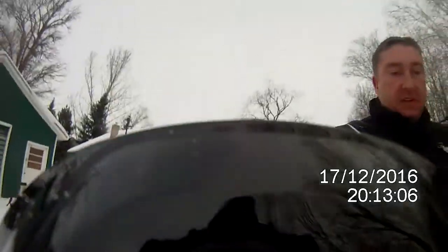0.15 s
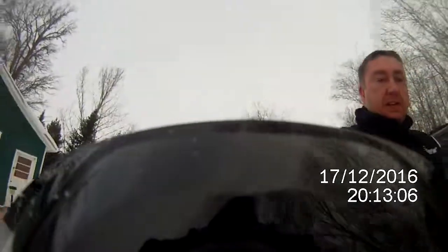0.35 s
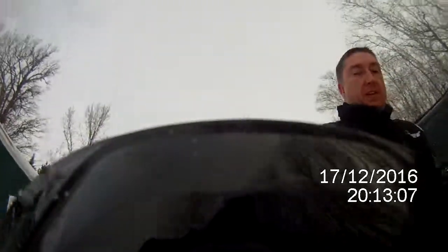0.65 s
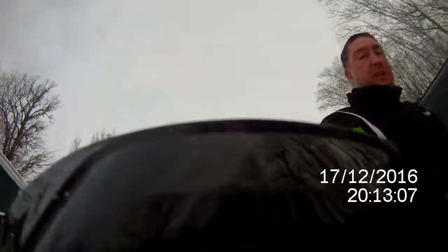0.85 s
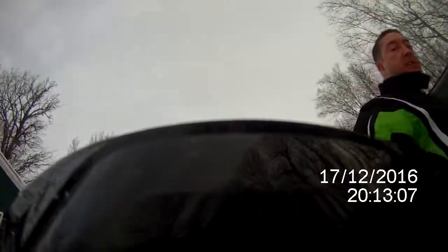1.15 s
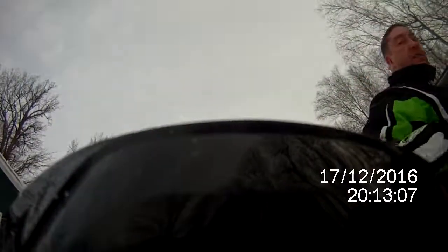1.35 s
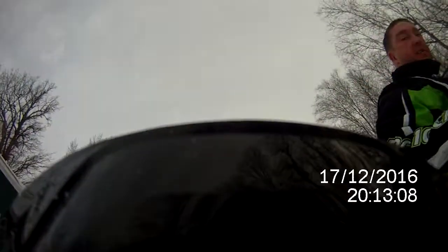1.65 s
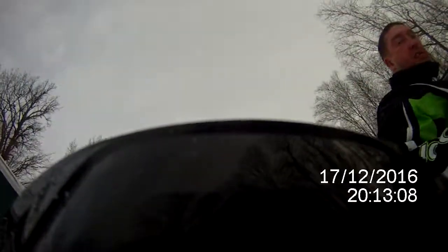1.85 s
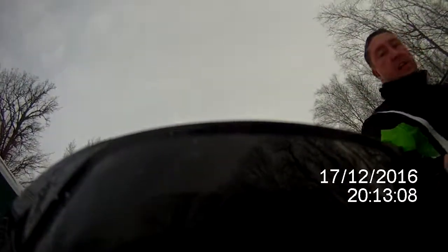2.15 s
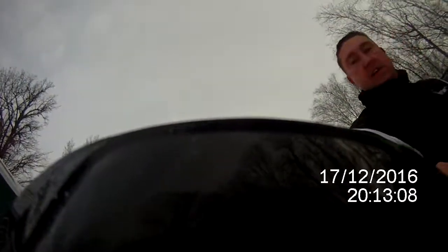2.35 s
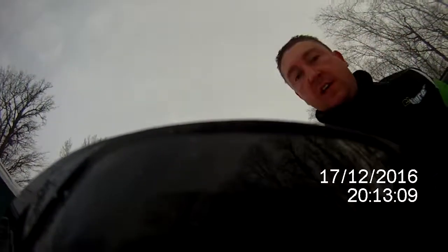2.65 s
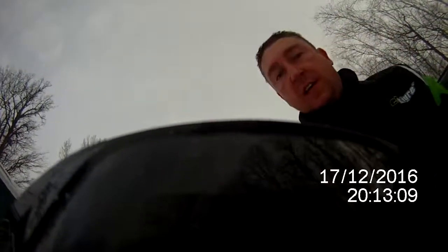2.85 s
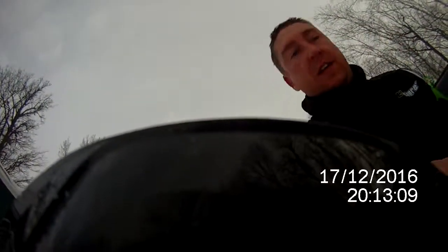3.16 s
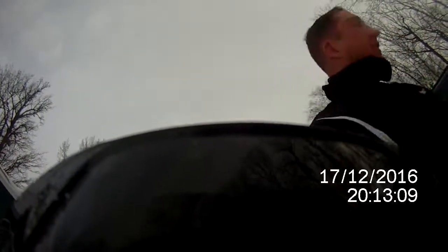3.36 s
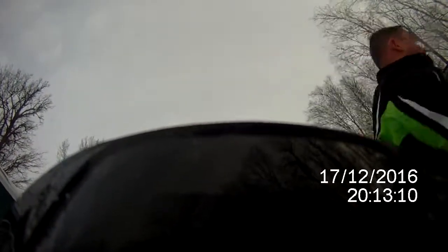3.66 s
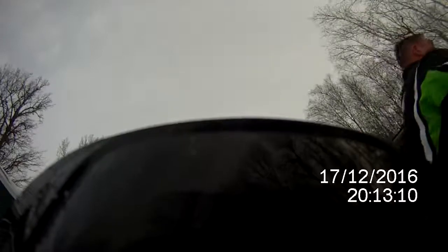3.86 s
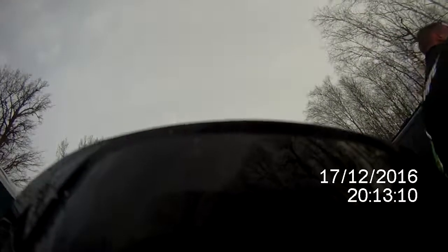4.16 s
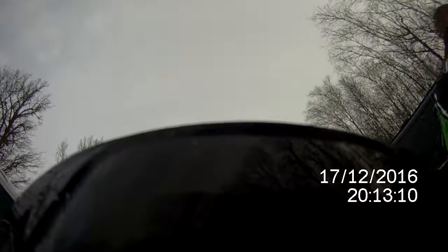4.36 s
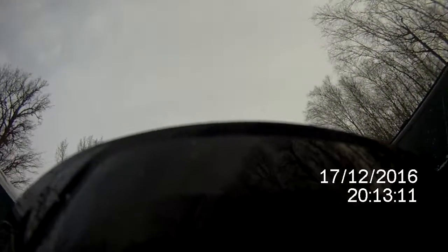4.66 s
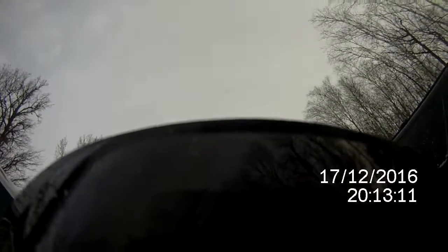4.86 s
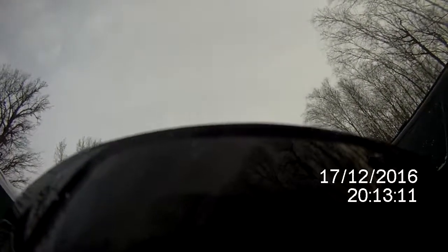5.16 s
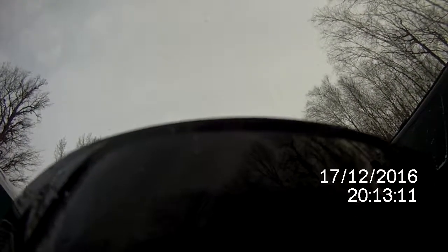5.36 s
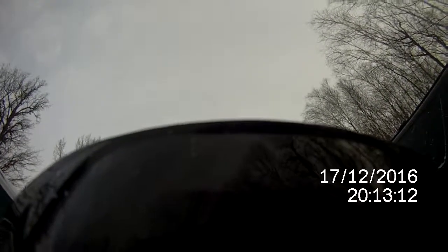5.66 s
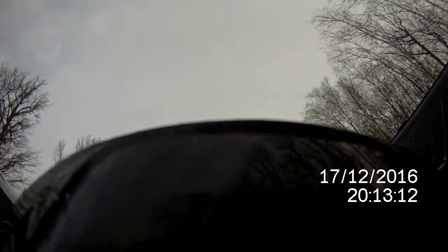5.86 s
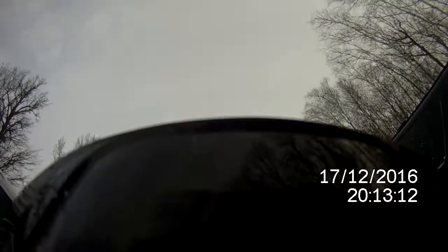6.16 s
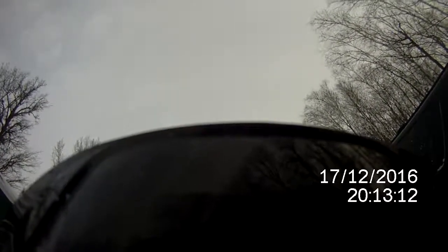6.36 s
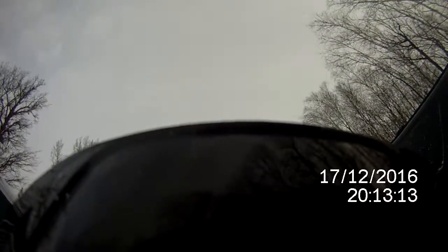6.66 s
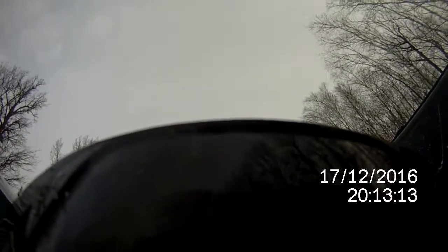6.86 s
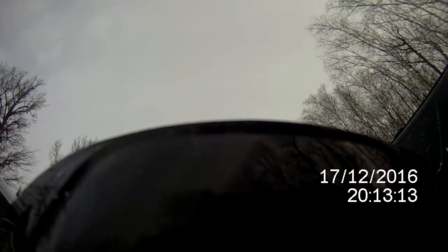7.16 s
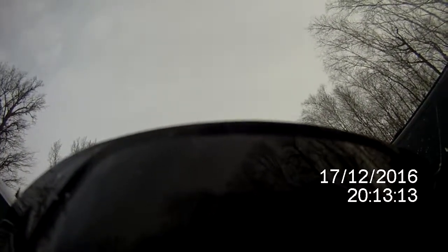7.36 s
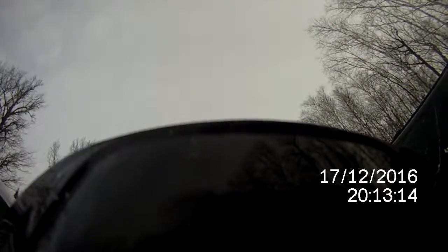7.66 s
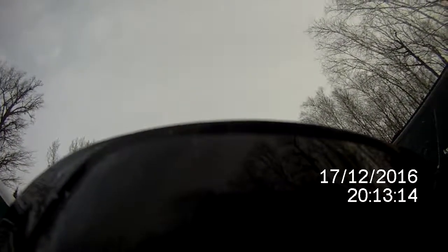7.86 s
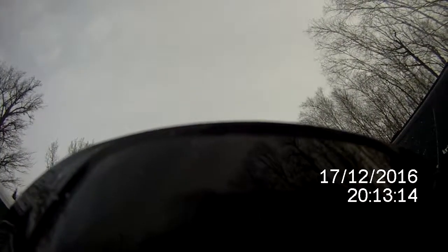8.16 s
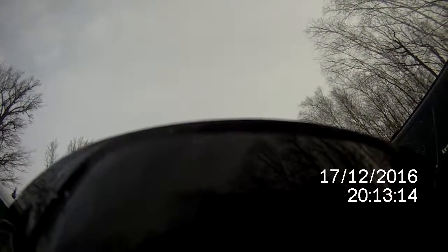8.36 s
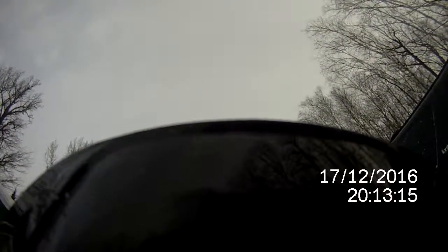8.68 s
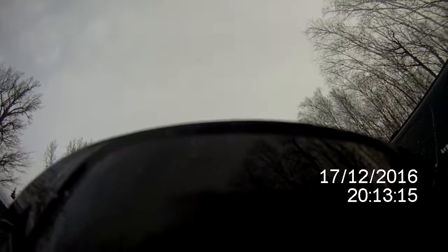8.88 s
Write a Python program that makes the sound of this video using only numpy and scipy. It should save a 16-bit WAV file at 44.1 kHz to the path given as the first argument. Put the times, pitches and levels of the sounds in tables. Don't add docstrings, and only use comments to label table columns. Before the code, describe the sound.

Muffled, close engine idle: low throbbing hum and a papery plastic buzz pulsing with each firing. First come small handling clicks and one hard double clack, then a quieter idle, then ticking that grows into a harsh, rapid rattle of the casing against the seat. The rattle cuts off, the boomy idle continues, and near the end faint taps return. Thin camera hiss with short noise bursts lies underneath.

```python
import sys
import numpy as np
from scipy import signal
from scipy.io import wavfile
from scipy.ndimage import uniform_filter1d

SR = 44100
rng = np.random.default_rng(int(sys.argv[2]) if len(sys.argv) > 2 else 0)


def volts(x):
    e = np.asarray(x, float) / 20
    return 10 ** e


def to_wav(s):
    ch = np.atleast_2d(s).T
    pcm = np.round(np.clip(ch, -1, 1) * 32767)
    wavfile.write(sys.argv[1], SR, pcm.astype(np.int16))


N = 397782


def in_time(rows):
    s, *columns = np.transpose(rows)
    return [np.interp(np.arange(N) / SR, s, column) for column in columns]


def rms_one(x):
    return x / np.sqrt(np.mean(x ** 2) + 1e-20)


def drift(rate):
    r = np.exp(-80 * np.pi * rate / SR)
    white = rng.standard_normal(N // 40 + 2002)
    slow = signal.lfilter([1], [1, -2 * r, r * r], white)[2000:]
    return np.interp(np.arange(N) / 40, np.arange(len(slow)), rms_one(slow))


def peak(x, hz, width_hz):
    r = np.exp(-np.pi * width_hz / SR)
    top = (1 - r * r) / 2 * np.array([1, 0, -1])
    feedback = [1, -2 * r * np.cos(2 * np.pi * hz / SR), r * r]
    return signal.lfilter(top, feedback, x + 1e-18)


def swell(x, hz, width_hz):
    wide = 1.55 * width_hz
    return peak(peak(x, hz, wide), hz, wide)


def passband(x, low_hz, high_hz, order=2):
    return signal.sosfilt(signal.butter(order, [low_hz, high_hz], "band", fs=SR, output="sos"), x)


def clicks(times, sizes):
    out = np.zeros(N)
    out[np.round(np.asarray(times) * SR).astype(int)] = sizes
    return out


def engine_lows(turns):
    # start_s, shake_db, boom_db, lean_db (boom from seat to pipe)
    rest = [(0, -69, -78, -4), (.3, -77, -76.5, 0), (.63, -72, -72.5, -15), (.95, -58, -63, -5),
            (1.4, -67, -68, 8), (1.76, -64, -64, 7.5), (2.1, -64, -71, 12), (2.5, -54.5, -57, 6.5),
            (3.3, -54.5, -65, 19), (3.9, -53, -63.5, 10), (4.3, -53, -62, 23), (4.65, -50, -66, 8),
            (5.1, -49.5, -65.5, -8), (6.2, -50.5, -63, -1.5), (6.9, -57.5, -71, -4.5), (8, -64.5, -69, 2.5),
            (8.45, -59, -61.5, -2.5), (9.02, -54.5, -64, -4)]
    # multiple, level_db, path (rounded: 0 shake, 1 seat, 2 pipe, 3 steady; -4 also shake)
    orders = [(1, 4, 0), (2, 0, 3), (3, -7, 1), (4, -26, -3.5), (5, 2.5, 1), (6, 0.5, 2), (7, -13.5, 1),
              (8, -23, 2), (9, -18.5, 2)]
    # centre_hz, width_hz, level_db, path (1 seat, 2 pipe)
    boom = [(171.4, 18.7, 2.5, 1), (203.6, 22, -6, 2), (249, 27, -17, 2), (286, 83, -21, 2)]
    shake_db, boom_db, lean_db = in_time(rest)
    steady_db = np.full(N, -69)
    gains = volts(np.array([shake_db, boom_db - lean_db / 2, boom_db + lean_db / 2, steady_db]))
    clean = 0.81
    unrest = drift(6.7)
    out = 0
    for order, level_db, path in orders:
        path = round(path)
        wobble = 0.023 * order * unrest
        line = np.sqrt(2) * np.cos(2 * np.pi * (order * turns + rng.random()) + wobble)
        wander_db = 0.96 * np.sqrt(order) * drift(4.7) + 3.2 * (path == 3) * drift(0.85)
        out = out + gains[path] * (clean if path else 1) * volts(level_db + wander_db) * line
    white = rng.standard_normal(N)
    for k, (hz, wide, db, path) in enumerate(boom):
        ring = rms_one(swell(white, hz, wide))
        out = out + (-1) ** k * np.sqrt(1 - clean ** 2) * gains[round(path)] * volts(db) * ring
    flutter = rms_one(passband(rng.standard_normal(N), 21, 197))
    flutter_db = -66.5 + 0.48 * (boom_db + 65)
    return out + volts(flutter_db + 2.0 * drift(4.7)) * flutter


def engine_buzz(turns):
    # start_s, level_db, brightness_db, throb_db (per firing)
    buzz = [(0, -62.5, -7, -0.5), (.7, -60, -6, 1), (1.4, -64, -3, 1.5), (2.05, -63.5, -3, 2),
            (2.6, -55, -7.5, 0.5), (4.5, -58, -5, -1), (4.65, -63, 2, 2.5), (5.3, -60, -0.5, 3),
            (6.3, -60.5, 0.5, 3), (6.8, -60.5, 3.5, 4.5), (7.6, -61, 1.5, 4), (7.9, -56, 0, 3.5),
            (8.3, -54.5, -3, 2.5), (9.02, -52, -5, 2)]
    # centre_hz, width_hz, level_db
    hummed = [(925, 130, 0.5), (1182, 128, -5.5), (1360, 177, -11), (1728, 240, -6.5), (2035, 282, -7.5),
              (2673, 228, -8), (3083, 200, -6.5), (3427, 180, -8), (3847, 325, -8.5), (4584, 450, -11),
              (5100, 91, -30)]
    level_db, bright_db, twice_db = in_time(buzz)
    middle_db = -0.5 + 0.64 * bright_db
    once_db = 0.45 * twice_db
    angle = 2 * np.pi * turns
    throb_db = once_db * np.cos(angle) + twice_db * np.cos(2 * angle + 1.15)
    throb_db = throb_db + 0.046 * twice_db * np.cos(4 * angle + 0.44)
    sizes = volts(3.27 * np.minimum(rng.exponential(1, N), 5))
    grains = sizes * rng.choice([-1, 1], N) * (rng.random(N) < 8000 / SR)
    dull = rms_one(volts(0.72 * throb_db + 1.26 * drift(38)) * grains)
    bright = rms_one(volts(1.3 * throb_db + 0.6 * drift(20)) * grains)
    rings = [(-1) ** k * volts(db) * swell(dull if k < 5 else bright, hz, wide)
             for k, (hz, wide, db) in enumerate(hummed)]
    low, middle, high = sum(rings[:3]), sum(rings[3:5]), sum(rings[5:8])
    high = high + volts(0.5 * bright_db + 0.5) * rings[8] + volts(-0.4 * bright_db - 1.0) * sum(rings[9:])
    return volts(level_db) * (low + volts(middle_db) * middle + volts(bright_db) * high) / np.std(low)


def blows_per_turn():
    # start_s, peak_db, sag_db (of the blows between)
    throws = [(2.655, -18, 2.5), (2.747, -17.5, 3), (2.808, -17, 1), (2.902, -16.5, 4), (2.996, -14, 6),
              (3.116, -15.5, 4.5), (3.241, -16, 2), (3.334, -17, 3), (3.488, -14, 4), (3.608, -14, 3.5),
              (3.76, -14, 3), (3.852, -12.5, 4), (4.004, -14, .5), (4.067, -18, 0), (4.1, -27, 0),
              (4.13, -12, 3.5), (4.249, -13.5, 4.5), (4.398, -12.5, 4), (4.549, -18.5, 0),
              (4.579, -19.5, -3)]
    turn_s, hurry_s = 0.0305, 0.002
    rows = [throws[-1][:2]]
    for (s, db, sag_db), (next_s, next_db, _) in zip(throws, throws[1:]):
        count = round((next_s - s) / turn_s)
        way = np.arange(count) / count
        times = s + way * (next_s - s) - hurry_s * np.sin(np.pi * way ** 0.8)
        levels_db = db + way * (next_db - db) - sag_db * np.sin(np.pi * way ** 1.4)
        rows += zip(times, levels_db)
    return rows


def crack(times, peak_db):
    snap = clicks(times, volts(1.75 * peak_db - 5))
    return swell(snap, 6250, 350) + volts(2.5) * swell(snap, 6550, 300) + volts(-8.0) * swell(snap, 10500, 3500)


def chatter(table, grit_db, grit_s):
    # centre_hz, width_hz, level_db
    shell = [(523, 73, -21), (874, 60.5, -4.5), (1055, 127, 1.5), (1500, 660, -5.5), (2060, 252, -3),
             (2643, 115, -5), (3000, 128, 0), (3575, 370, -5), (3950, 300, -3.5), (4850, 630, -24),
             (5136, 368, -16.5)]
    s, peak_db = np.transpose(table)
    spread = rng.standard_normal((len(s), len(shell) + 2))
    s = s + 0.0003 * np.clip(spread[:, -2], -2, 2)
    starts = clicks(s, volts(peak_db + 23.5 + grit_db))
    fading = signal.lfilter([1], [1, -np.exp(-1 / (grit_s * SR))], starts + 1e-18)
    grit = fading * rng.standard_normal(N) * (rng.random(N) < 1500 / SR)
    out = np.zeros(N)
    busy = slice(int(s.min() * SR), int(s.max() * SR) + SR // 5)
    for k, (hz, wide, db) in enumerate(shell):
        hard_db = 0.15 * (peak_db + 22.5) * np.log2(hz / 1500)
        jitter_db = 0.7 * spread[:, k]
        blows = clicks(s, volts(peak_db + 23.5 + hard_db + jitter_db))
        touch_and_blow = volts(-6.5) * blows + np.roll(blows, int(0.000889 * SR))
        force = volts(db) * (touch_and_blow + grit)[busy]
        out[busy] += (-1) ** k * (swell(force, hz, wide) + volts(-34.0) * peak(force, hz, 0.22 * wide))
    thud_db = 0.6 * peak_db + 1.2 * spread[:, -1]
    thud = clicks(s, volts(thud_db + 14))
    thuds = swell(thud, 183, 55) + volts(-21.5) * passband(swell(thud, 262, 70), 200, 348)
    return passband(out, 496, 6500, order=4) + thuds + crack(s + 0.0006, peak_db)


def knocks():
    # start_s, peak_db, centre_hz, breadth_octaves, thud_db
    hits = [(.095, -41, 2380, 5.1, -57), (0.132, -47, 2500, 2, -71), (.181, -38, 950, 0.4, -67),
            (0.297, -47, 3300, .5, -64), (0.356, -42, 3200, 0.31, -61), (0.395, -27, 1600, 0.6, -62),
            (0.455, -40, 2290, 0.56, -71), (.552, -40.5, 3280, 0.97, -58), (0.632, -38, 3150, 0.28, -58),
            (.720, -28, 1000, 1.6, -42), (.758, -45, 3300, .6, -60), (0.765, -42, 3200, 0.66, -65),
            (.804, -9, 3700, 1.58, -31.5), (0.826, -7.5, 3730, 1.49, -29.5), (0.91, -41, 2500, 1.2, -53),
            (1.035, -40, 3000, 2.4, -50), (8.419, -20.5, 2280, 0.58, -69), (8.935, -34, 4900, 0.43, -63),
            (8.946, -34.5, 4840, 0.35, -63), (8.961, -30.5, 1100, 1.5, -53), (8.973, -37, 1110, 1.9, -60)]
    # centre_hz, width_hz, level_db
    grip = [(885, 94, 5.5), (1096, 430, -4), (1786, 194, -1.5), (2060, 340, -12), (2690, 124, -1.5),
            (3000, 220, -2), (3710, 340, -1.5), (4030, 330, -4.5), (4980, 310, -11), (6200, 320, -49)]
    s, peak_db, centre_hz, breadth, thud_db = np.transpose(hits)
    out = np.zeros(N)
    for k, (hz, wide, db) in enumerate(grip):
        away_db = -6.0 * (np.log2(hz / centre_hz) / np.clip(breadth, 0.3, 5)) ** 2
        touch = clicks(s + 0.0003, volts(peak_db + db + 19.0 + away_db))
        dull_db = -11.0 * np.log2(hz / 900)
        later = [(0.0009, 6), (0.0026, -6.5), (0.0062, 3.5 + dull_db), (0.011, -18 + dull_db)]     # (lag s, dB)
        blows = touch + sum(volts(gain_db) * np.roll(touch, int(lag * SR)) for lag, gain_db in later)
        out += (-1) ** k * (swell(blows, hz, wide) + volts(-19) * peak(blows, hz, 0.3 * wide))
    firm = peak_db > -33
    thud = clicks(s, firm * volts(thud_db + 54.0))
    thuds = peak(thud, 196, 12.4) + volts(-36) * peak(thud, 210, 40)
    edge = volts(-2) * crack(s + 0.00056, peak_db)
    edge = edge + swell(clicks(s + 0.00091, volts(1.5 * peak_db - 6)), 8400, 420)
    return passband(out, 660, 5350, order=3) + thuds + edge


def electronics():
    # start_s, length_s, wait_s (from the first to the second)
    writes = [(.49, .02, 0), (.636, .034, .094), (.824, .052, 0), (.978, .031, .052), (1.225, .03, .151),
              (1.525, .03, .15), (2.033, .14, 0), (2.276, .034, .151), (2.524, .03, .149),
              (2.775, .026, .057), (2.97, .03, 0), (4.342, .033, .14), (4.592, .032, 0),
              (4.739, .038, .081), (4.923, .032, .113), (5.225, .035, .064), (5.476, .031, .057),
              (5.737, .071, .048), (5.979, .034, .056), (6.228, .034, .106), (6.479, .034, .116),
              (6.742, .03, 0), (8.254, .075, 0), (8.499, .04, .058), (8.747, .05, .063), (8.86, .04, 0)]
    # pitch_hz, level_db (rms)
    whine_lines = [(5195, -86.5), (7776, -88), (7837, -86.5), (7897, -90), (11003, -93), (11090, -86)]
    gate = np.zeros(N)
    for s, length, wait in writes:
        for start in (s, s + wait):
            gate[int(start * SR):int((start + length) * SR)] = 1
    gate = uniform_filter1d(gate, size=180)
    hiss = rms_one(passband(rng.standard_normal(N), 1500, 8600, order=1))
    t = np.arange(N) / SR
    whines = 0
    for hz, db in whine_lines:
        level = volts(db + 1.5 * drift(3.7))
        whines = whines + level * np.sqrt(2) * np.sin(2 * np.pi * hz * t + 0.84 * drift(7.1))
    return (volts(-73) + volts(-71.5) * gate) * hiss + whines


def scene():
    # start_s, peak_db
    loose = [(2.13, -37.5), (2.151, -30), (2.157, -38), (2.186, -31.5), (2.212, -38), (2.221, -34),
             (2.247, -26.5), (2.268, -37), (2.279, -32.5), (2.311, -33), (2.323, -47), (2.336, -27),
             (2.344, -29), (2.369, -27), (2.377, -40), (2.403, -38), (2.416, -53), (2.4325, -27.5),
             (2.437, -28.5), (2.457, -49), (2.467, -31.5), (2.495, -32), (2.499, -25), (2.518, -45),
             (2.53, -27), (2.559, -24), (2.562, -27.5), (2.595, -18), (2.62, -20.5),
             (2.579, -34),
        (2.640, -35),
        (4.607, -37),
    ]
    # start_s, peak_db
    taps = [(8.016, -36), (8.327, -36), (8.359, -35), (8.449, -39), (8.484, -42), (8.513, -36),
            (8.546, -38), (8.606, -44), (8.654, -37), (8.666, -44), (8.716, -35), (8.762, -34),
            (8.809, -39), (8.85, -38), (8.869, -44), (8.901, -38), (8.912, -39)]
    turns = np.cumsum(in_time([(0, 34.5), (.3, 33.5), (.85, 34.1), (1.35, 32.5), (1.7, 33.8), (2.2, 32.7),
                               (2.6, 31.8), (2.75, 32.5), (3.4, 32.4), (3.7, 33.3), (4.1, 32.1),
                               (4.3, 33.6), (4.9, 32.25), (5.4, 32.6), (6.3, 32.3), (6.8, 33.1),
                               (8.35, 31.6), (9.02, 32.9)])[0]) / SR
    contacts = chatter(loose, grit_db=-5, grit_s=0.0031)
    contacts = contacts + chatter(blows_per_turn(), grit_db=-19, grit_s=0.0061)
    contacts = contacts + chatter(taps, grit_db=-21, grit_s=0.0034) + knocks()
    capsule = volts(2.5) * engine_lows(turns) + engine_buzz(turns) + contacts + electronics()
    return np.array([capsule, capsule])


def roll_off(x):
    return signal.sosfilt(signal.butter(12, 16120, fs=SR, output="sos"), x)


def record(dry):
    left, right = dry
    right = signal.lfilter(*signal.butter(1, 140, "high", fs=SR), right)
    rumble = rms_one(passband(rng.standard_normal(N), 27, 260, order=1))
    left = left - 0.01117 + volts(-99) * rumble
    hiss = volts(-71) * passband(rng.standard_normal((2, N)), 60, 14000, order=1)
    top_cut = signal.ellip(10, 0.5, 60, 15150, fs=SR, output="sos")
    return roll_off(signal.sosfilt(top_cut, np.array([left, right]) + hiss))


dry = scene()
out = record(dry)
to_wav(out)
```